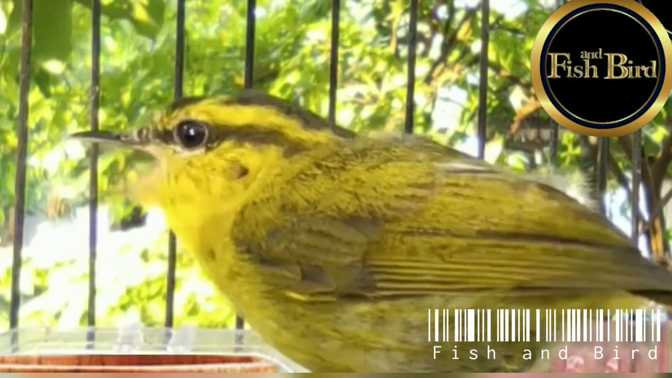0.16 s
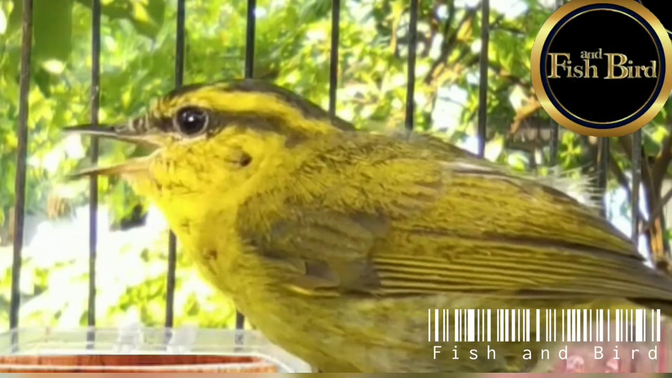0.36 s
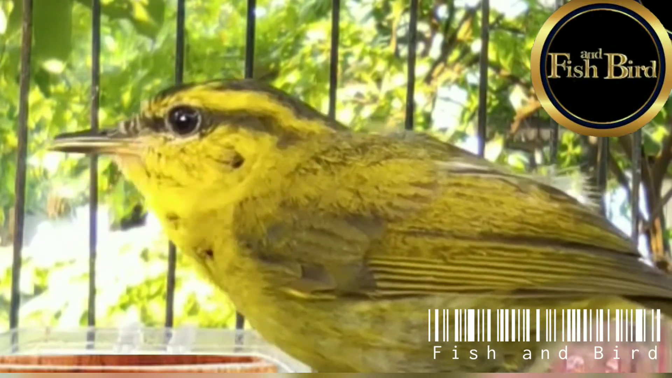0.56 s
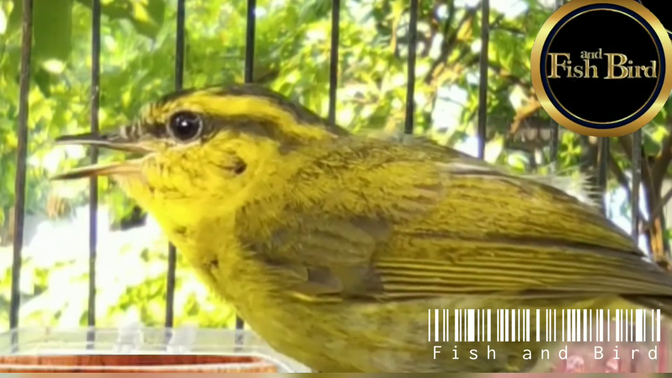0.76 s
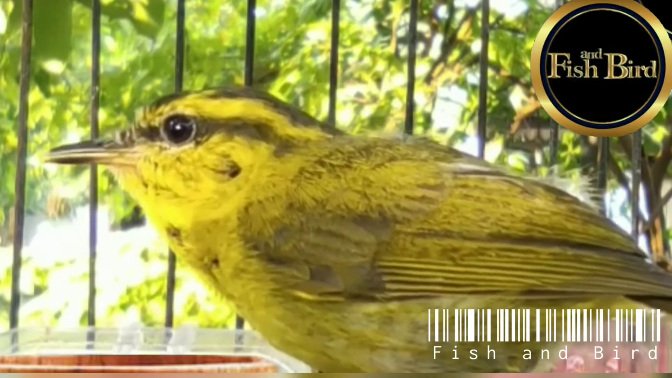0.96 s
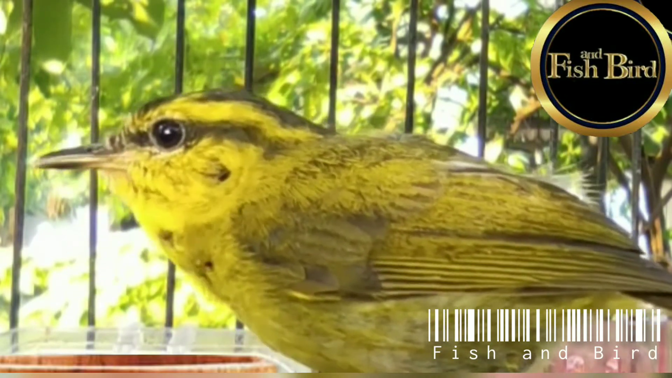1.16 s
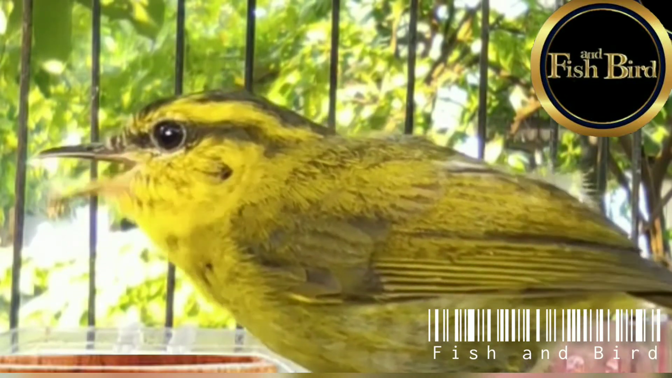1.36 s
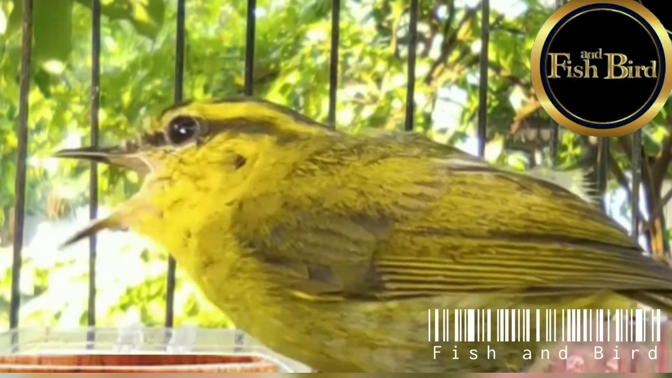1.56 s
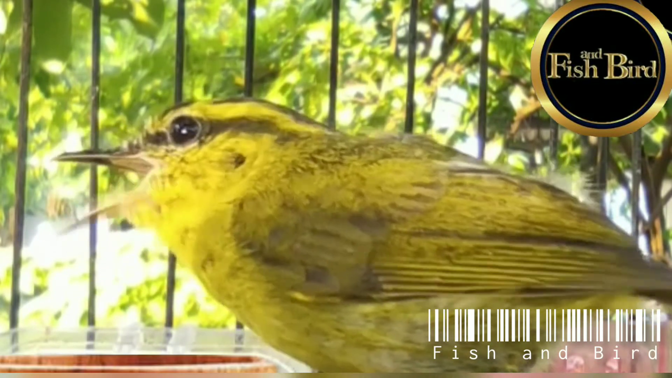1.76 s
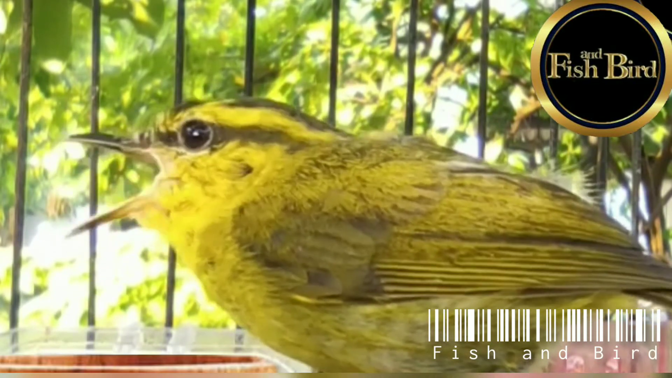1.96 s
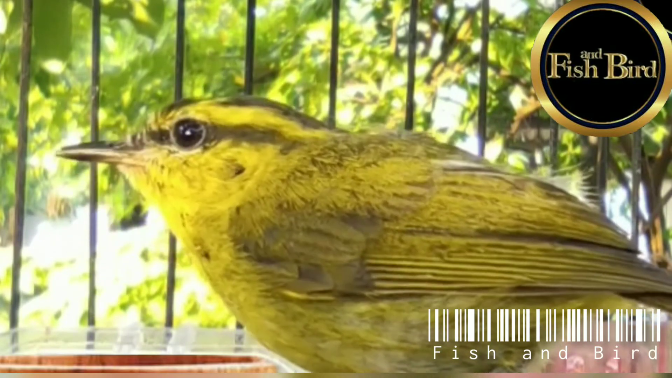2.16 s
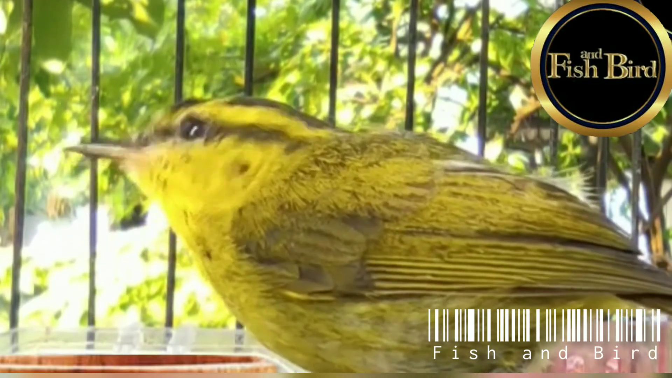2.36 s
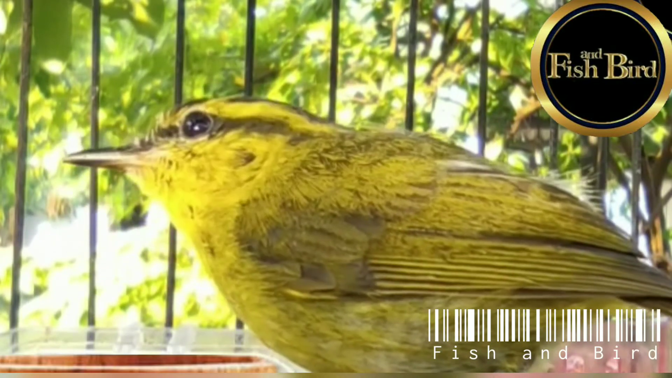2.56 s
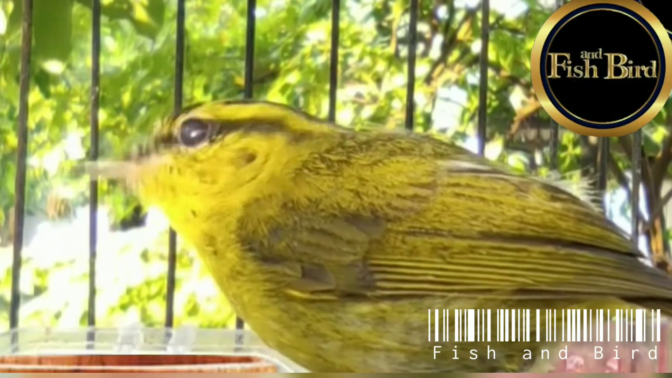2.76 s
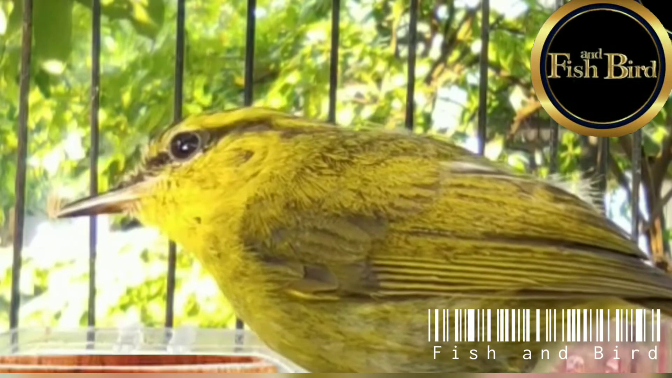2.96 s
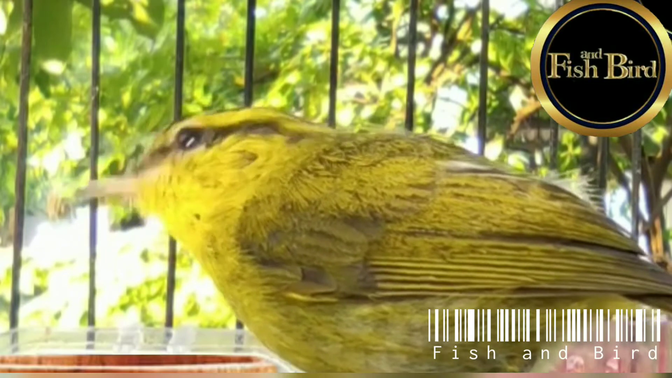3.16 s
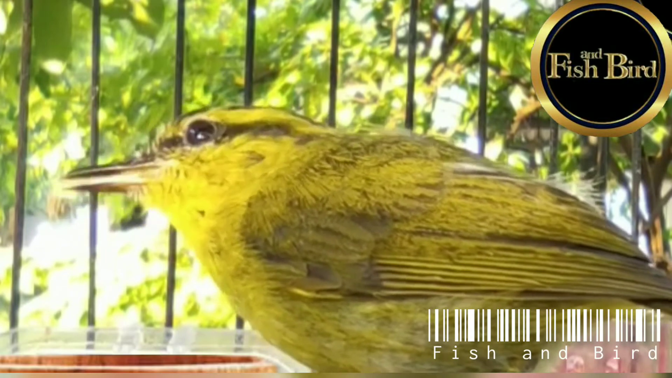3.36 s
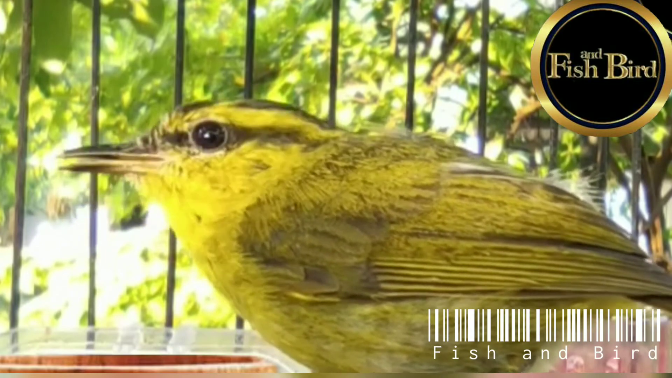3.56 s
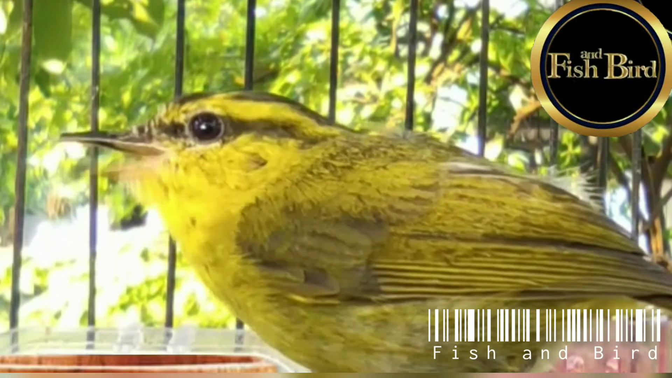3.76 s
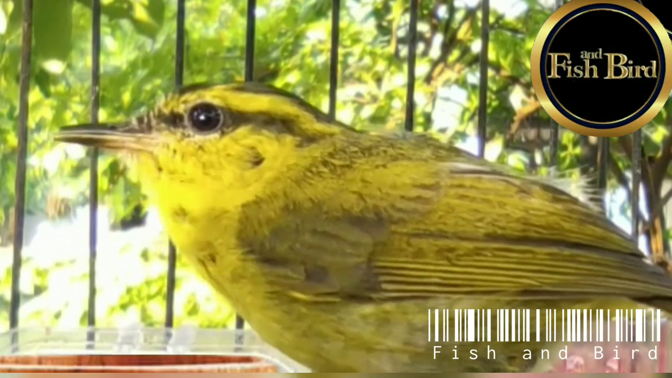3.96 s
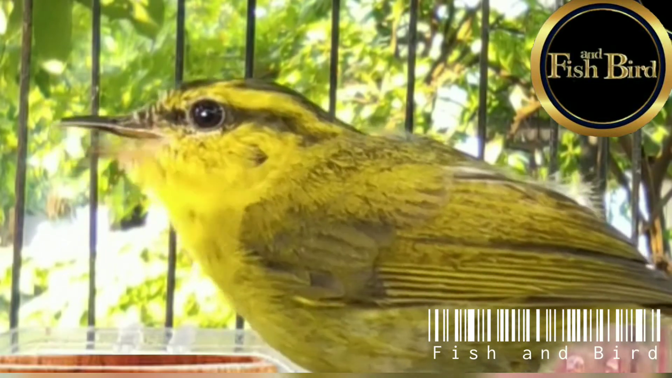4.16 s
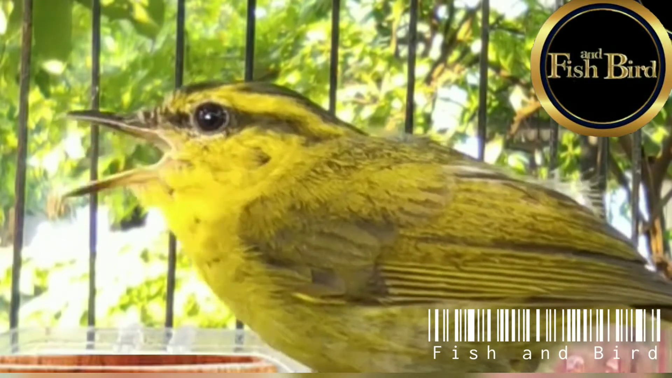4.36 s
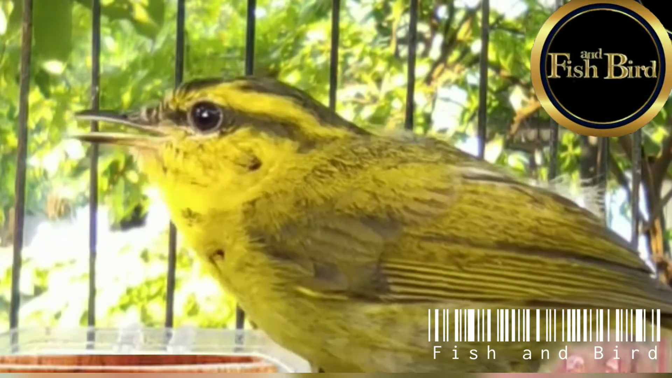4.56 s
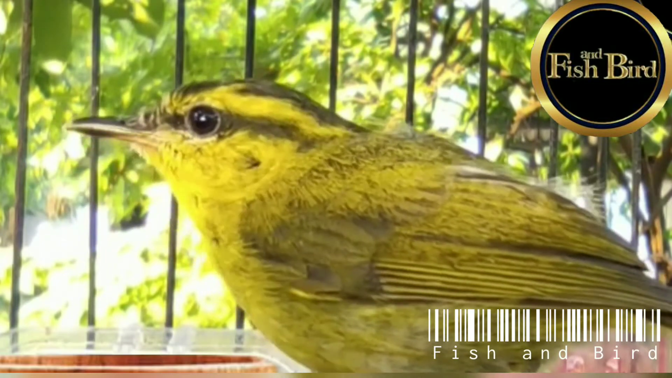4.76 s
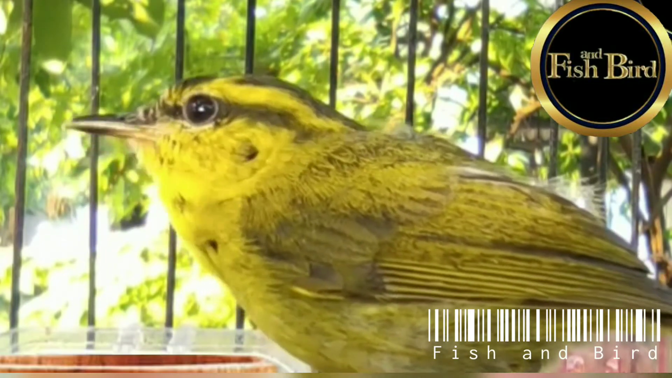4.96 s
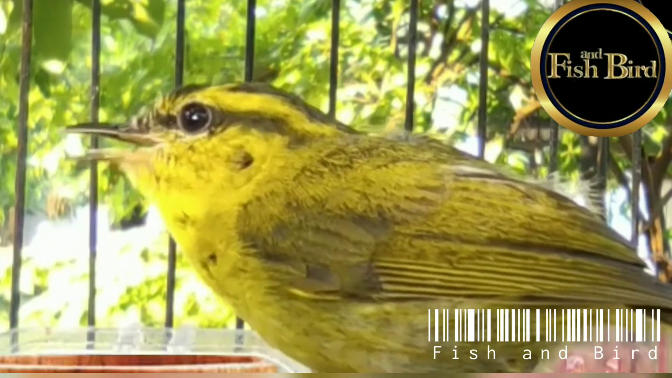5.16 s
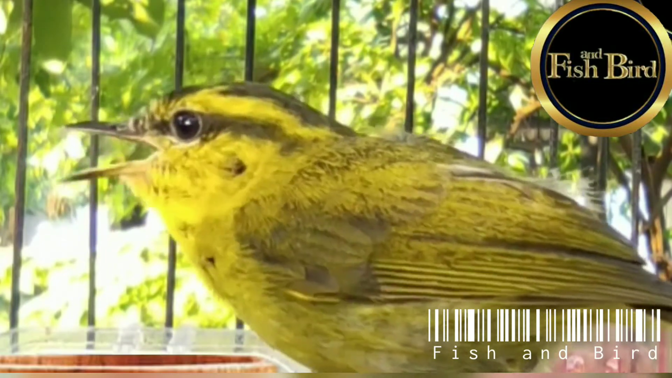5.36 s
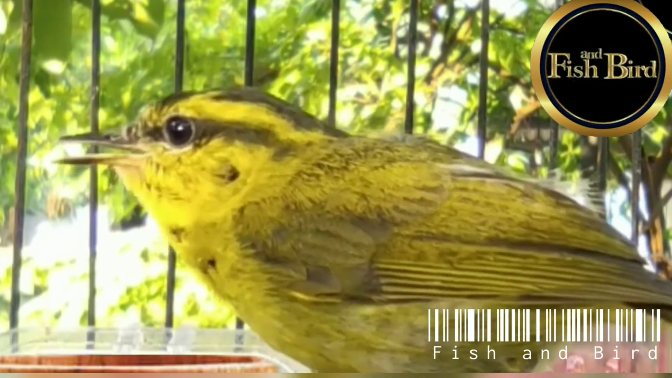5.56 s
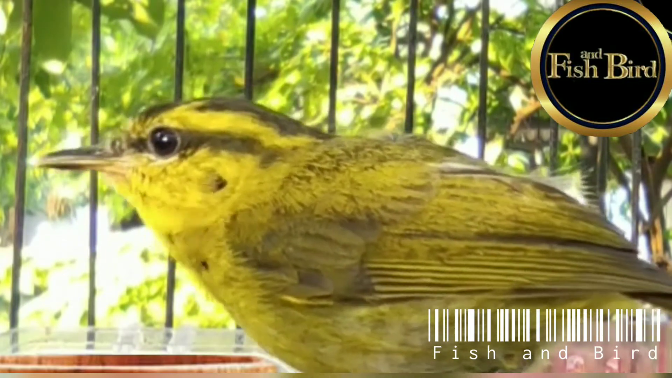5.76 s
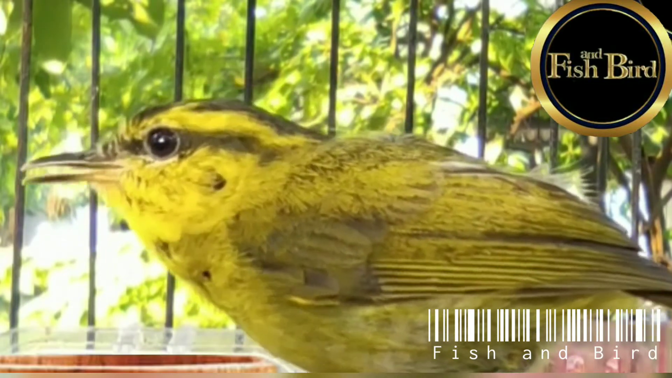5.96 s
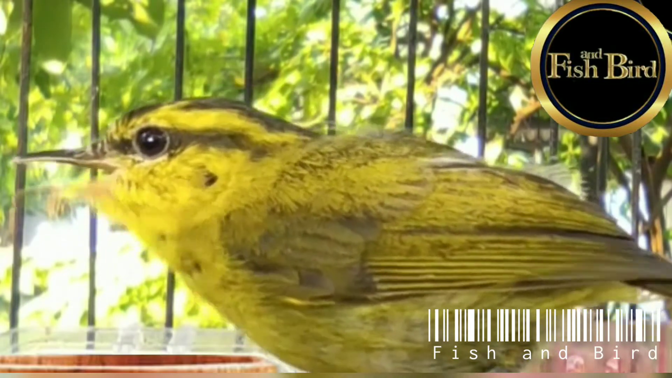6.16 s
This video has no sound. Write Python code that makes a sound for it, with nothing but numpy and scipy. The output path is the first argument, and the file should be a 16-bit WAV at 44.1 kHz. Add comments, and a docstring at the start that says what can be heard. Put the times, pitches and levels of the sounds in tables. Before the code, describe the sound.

A small caged warbler sings two fast, high twittering phrases up close, with other birds chirping farther off.

```python
"""In a room, a small caged warbler sings two fast twittering phrases right at a stereo microphone.
Each syllable is one sliding whistle with an overtone an octave up; high notes tend to be louder, and
some leap up from a low lead-in note. The loudest overload the recorder. Other birds chirp farther off,
over a low rumble, a machine hum, passing traffic and a few faint distant tones."""
import sys
import numpy as np
from scipy import signal
from scipy.fft import rfft, irfft, next_fast_len
from scipy.io import wavfile
from scipy.ndimage import uniform_filter1d, minimum_filter1d

SR = 44100
rng = np.random.default_rng(int(sys.argv[2]) if len(sys.argv) > 2 else 0)


def wrap_up_sound(samples):
    """Save the sound to the file named by the first command line argument, as 16-bit audio."""
    columns = np.atleast_2d(samples).T
    # keep every value between -1 and 1, then stretch to whole-number steps
    tamed = np.clip(columns, -1, 1)
    steps = np.round(tamed * 32767).astype(np.int16)
    wavfile.write(sys.argv[1], SR, steps)


N = 274302


def gain_of(db):
    """Turns decibels into a number to multiply by."""
    return 10 ** (np.asarray(db) / 20)


def evened(x):
    """Scales a sound so its average strength (rms) is 1."""
    return x / np.sqrt(np.mean(x ** 2) + 1e-20)


def look_up(table, hz, column=1):
    """Reads a table at any frequency, blending between its rows."""
    table = np.array(table, float)
    return np.interp(np.log(hz + 1), np.log(table[:, 0] + 1), table[:, column])


def add(mix, start_s, sound):
    """Mixes a sound in at its start time."""
    part = mix[..., max(round(start_s * SR), 0):][..., :sound.shape[-1]]
    part += sound[..., :part.shape[-1]]


def waver(count, hz):
    """A random wiggle of strength 1, mostly slower than hz."""
    size = next_fast_len(count + SR // 8)
    freqs = np.fft.rfftfreq(size, 1 / SR)
    spectrum = rfft(rng.standard_normal(size)) / (1 + (freqs / hz) ** 4)
    return evened(irfft(spectrum, size))[:count]


def phase_of(pitch):
    """How far a wave of changing pitch has turned, in radians."""
    return 2 * np.pi * np.cumsum(pitch) / SR


def glides(table, rasp, rasp_hz, swell_db, sweep_rasp=0):
    """Sliding tones that grow or fade. Rasp shakes the pitch; sweep_rasp adds more on wide slides."""
    out = np.zeros(N)
    for start, length, first_hz, last_hz, db in table:
        count = int(length * SR)
        shake = rasp + sweep_rasp * abs(np.log(last_hz / first_hz))
        pitch = np.linspace(first_hz, last_hz, count) * (1 + shake * waver(count, rasp_hz))
        shape = signal.windows.tukey(count, .5) * gain_of(np.linspace(0, swell_db, count))
        add(out, start, gain_of(db) * evened(np.sin(phase_of(pitch)) * shape))
    return out


# The background noise from bass to treble: (frequency [Hz], relative level [dB])
NOISE_COLOUR = [(25, -16), (50, -3), (85, -5), (115, -8), (160, -4), (250, -7), (700, -16), (950, -15),
                (1400, -19), (4500, -22.5), (8500, -20), (11000, -38.5), (14500, -39.5), (16000, -78.5)]
# How alike that noise is in the two microphones: (frequency [Hz], likeness [0-1])
NOISE_LIKENESS = [(150, 0.67), (400, 0.68), (1000, 0.072)]
# Its slow rise: (time [s], level change [dB])
NOISE_SWELL = [(1.8, -13), (3.599, -10.5), (5.201, -9), (6.199, -7)]


def rumble(left_db=-27, right_db=-29, patchy_db=2.06):
    """A low rumble, alike in both microphones, under a thin hiss from all around."""
    frames, hz = N // 512 + 5, np.fft.rfftfreq(2048, 1 / SR)
    a, b, c, d, patches = rng.standard_normal((frames, len(hz), 5)).T
    left, unrelated = a + 1j * b, c + 1j * d
    likeness = look_up(NOISE_LIKENESS, hz)[:, None]
    right = likeness * left + np.sqrt(1 - likeness ** 2) * unrelated
    patches = uniform_filter1d(patches, size=24, axis=0)  # blur across pitch...
    patches = evened(uniform_filter1d(patches, size=5, axis=1))  # ...and across time
    colour = gain_of(look_up(NOISE_COLOUR, hz)[:, None] + patchy_db * patches)
    noise = signal.istft(np.array([left, right]) * colour, nperseg=2048, noverlap=1536)[1][:, :N]
    swell_db = np.interp(np.arange(N) / SR, *np.transpose(NOISE_SWELL))
    return evened(noise) * gain_of(swell_db) * gain_of([[left_db], [right_db]])


# The tones of a humming machine: (pitch [Hz], level [dB])
HUM_TONES = [(135, -51), (150.5, -51.5), (177, -56)]


def machine_hum(drift=0.0122, drift_hz=3, sway_db=3.5, lean_left_db=3.5):
    """A machine hums a few low tones that drift a little in pitch and level."""
    out = np.zeros(N)
    for hz, db in HUM_TONES:
        level = np.sqrt(2) * gain_of(db + sway_db * waver(N, drift_hz))
        pitch = hz * (1 + drift * waver(N, drift_hz))
        out += level * np.sin(phase_of(pitch))
    return out * gain_of([[lean_left_db], [-lean_left_db]])


# Traffic going by: (time [s], length [s], first pitch [Hz], last pitch [Hz], level [dB])
TRAFFIC_DRONES = [(.1, 0.82, 86.6, 78.2, -46.5), (3.1, 1, 85.7, 93.3, -44.5),
                  (4.05, 0.51, 74.1, 68.8, -45.5), (4.62, 0.62, 76.1, 80, -43.5)]


def traffic():
    """Passing traffic makes low, unsteady drones that fade."""
    return glides(TRAFFIC_DRONES, rasp=0.087, rasp_hz=25, swell_db=-4)


# Far-off tones: (time [s], length [s], first pitch [Hz], last pitch [Hz], relative level [dB])
DISTANT_TONES = [(.6, 0.41, 670, 703.6, -50.5), (.62, 0.42, 1085, 1070, -51), (1.05, 0.47, 970, 1021, -45),
                 (1.9, 1.4, 964.5, 933, -56.5), (4.7, 0.29, 848, 1100, -53)]


def distant_tones():
    """Faint, wavering tones that each grow a little louder."""
    return glides(DISTANT_TONES, rasp=0.0275, rasp_hz=45.4, swell_db=2.5)


# How long the room rings: (frequency [Hz], time to fade by 60 dB [s])
ROOM_RING = [(3000, 0.4), (6000, 0.38), (14000, 0.35)]


def room(sound, first_echo_s=0.0095):
    """A wash of echoes, different in each microphone; the treble dies a little sooner."""
    echoes = rng.standard_normal((2, SR)) * (np.arange(SR) > first_echo_s * SR)
    hz, t, spectrum = signal.stft(echoes, SR, nperseg=256)
    fade = gain_of(-60 * t / look_up(ROOM_RING, hz)[:, None])
    tail = signal.istft(spectrum * fade, SR, nperseg=256)[1]
    return signal.fftconvolve(np.atleast_2d(sound), tail / np.linalg.norm(tail[0]), axes=1)[:, :N]


def chatter(count=50, length_s=.04, mean_db=-46):
    """The farthest birds give faint falling chips at random moments and pitches."""
    chips = []
    for when, height, loudness in rng.random((count, 3)):
        hz = 4500 + 3500 * height
        chips.append((when * N / SR, length_s, hz, .7 * hz, mean_db + 10 * (loudness - .5)))
    return glides(chips, rasp=0.015, rasp_hz=600, swell_db=-38, sweep_rasp=0.04)


# Other birds: (time [s], length [s], first pitch [Hz], last pitch [Hz], relative level [dB])
BIRD_CHIRPS = [ (.027, 0.02, 4150, 2050, -27.5), (0.28, 0.052, 4720, 4830, -30),
               (.395, 0.082, 6160, 4950, -29.5), (.32, 0.07, 6260, 6170, -27),
               (0.783, 0.087, 6180, 6330, -28.5), (.882, 0.029, 3690, 2290, -28),
               (0.93, 0.06, 6470, 4960, -27), (0.98, 0.083, 4960, 4800, -27),
               (1.14, 0.028, 6470, 4630, -25.5), (1.255, 0.025, 3540, 4870, -26.5),
               (1.36, 0.055, 6970, 7040, -34), (1.894, 0.19, 2170, 2850, -43),
               (2.345, 0.044, 4950, 4970, -41.5), (2.383, 0.024, 4700, 3710, -45.5),
               (2.655, 0.03, 6530, 4870, -46), (2.695, 0.046, 4910, 4850, -37.5),
               (2.728, 0.032, 4700, 3380, -44), (2.719, 0.052, 6910, 7370, -39.5),
               (2.895, 0.029, 6900, 4900, -44), (3.08, 0.1, 2950, 1926, -45.5),
               (3.228, 0.014, 2800, 2680, -33), (3.261, 0.029, 3370, 4420, -28),
               (3.447, 0.025, 4910, 4330, -30), (3.476, 0.017, 3675, 2420, -25.5),
               (3.857, 0.048, 6910, 7080, -27), (3.964, 0.1, 2360, 2692, -37.5),
               (4.095, 0.041, 3350, 4360, -26.5), (4.26, 0.084, 3430, 2290, -36.5),
               (4.366, 0.031, 3490, 2540, -32.5), (4.925, 0.1, 3850, 3630, -42),
               (5.17, 0.15, 3634, 3580, -35), (5.14, 0.041, 6970, 9300, -33),
               (5.21, 0.083, 6800, 7340, -34), (5.5, 0.022, 3750, 2196, -28),
               (5.976, 0.082, 2430, 2757, -35.5), (6.054, 0.03, 6730, 7040, -21.5)]


def chirps():
    """Birds across the room chirp; the wider a chirp slides, the hoarser it is."""
    return glides(BIRD_CHIRPS, rasp=0.012, rasp_hz=725, swell_db=-1.5, sweep_rasp=0.19)


# The four notes of a second bird's rising call: (pitch [Hz])
CALL_NOTES = [2108, 2715, 2998, 3585]
# Each time it calls: (time [s], length [s], relative level [dB])
CALLS = [(0.133, 0.11, -29), (0.986, 0.16, -29.5), (3.586, 0.1, -26), (4.476, 0.108, -29),
         (5.602, 0.11, -27)]


def rising_calls(rasp=0.036, rasp_hz=600, swell_db=22, slide_s=0.018, throb_hz=65, throb_db=3):
    """A bird climbs a stair of throbbing notes, hoarse at first, then clearer and louder."""
    out = np.zeros(N)
    for start, length, db in CALLS:
        progress = np.linspace(0, 1, int(length * SR), endpoint=False)
        stair = np.array(CALL_NOTES, float)[(progress * len(CALL_NOTES)).astype(int)]
        stair = uniform_filter1d(stair, int(slide_s * SR))
        pitch = stair * (1 + rasp * (1 - 0.56 * progress) * waver(len(stair), rasp_hz))
        throb = throb_db * np.sin(2 * np.pi * (throb_hz * length * progress + rng.random()))
        shape = signal.windows.tukey(len(stair), .25) * gain_of(swell_db * progress + throb)
        add(out, start, gain_of(db) * evened(np.sin(phase_of(pitch)) * shape))
    return out


def cage_echoes(song, echo_db=-24, first_s=0.003, last_s=.035, fall_db=-7, count=8):
    """Dish, bars and nearby walls send back echoes that clash with the song and make it flutter."""
    out = np.zeros((2, N))
    for side in (0, 1):
        lateness = (np.arange(count) + rng.random(count)) / count
        delays = first_s + (last_s - first_s) * lateness
        gains = gain_of(fall_db * lateness)
        for delay, gain in zip(delays, gains / np.linalg.norm(gains)):
            add(out[side], delay, gain * song[side])
    return gain_of(echo_db) * out


def recording_fizz(song, hiss_db=-44, fizz_db=-31, hiss_hz=(2000, 15000), fizz_hz=(12500, 16000)):
    loudness = np.sqrt(abs(uniform_filter1d(song ** 2, size=300, axis=1)))
    peaks = np.minimum(loudness / 0.89, 1) ** 4
    bands = (signal.butter(6, hz, "bandpass", fs=SR, output="sos") for hz in (hiss_hz, fizz_hz))
    hiss, fizz = (evened(signal.sosfilt(band, rng.standard_normal((2, N)))) for band in bands)
    return gain_of(hiss_db) * loudness * hiss + gain_of(fizz_db) * peaks * fizz


# How the song reaches the microphones: (frequency [Hz], left louder by [dB], left ahead by [radians])
MIC_PATHS = [(3100, -4.5, -1.2), (3100, -0.5, -1.46), (3660, 0.3, -0.6), (3640, 13, -0.5), (3836, 5.5, -3),
             (4120, -10, -1.64), (4150, -0.5, -1.18), (4560, 1, -1.96), (4600, -6, -1.46), (4710, 5, -1.52),
             (5047, -1.5, -2.5), (5520, -3.5, -1.5), (5530, 3, -1.5), (5860, -6.5, -2.5), (6540, -10, -1.5),
             (6420, -17, -0.5), (6800, -8, -1.6), (7420, -15.5, -1.4), (9100, 12, 2)]
# The bird turns its head, shifting high notes most: (time [s], extra left lead at 5500 Hz [radians])
HEAD_TURNS = [(2.1, -0.23), (3.6, -0.3), (4.55, -0.51), (4.9, 0.17)]


def at_microphones(start_s, pitch, levels):
    """Nearby reflections make each pitch louder and earlier in one microphone than in the other."""
    phase = phase_of(pitch)
    head_turn = np.interp(start_s, *np.transpose(HEAD_TURNS))
    out = np.zeros((2, len(pitch)))
    for harmonic, level in enumerate(levels, 1):
        hz = harmonic * pitch
        paths = [look_up(MIC_PATHS, hz), look_up(MIC_PATHS, hz, column=2)]
        # the reflections need a few milliseconds to follow a leap in pitch
        balance_db, lead = uniform_filter1d(paths, size=130, mode="nearest")
        balance = gain_of(balance_db)
        lead = lead + head_turn * (hz / 5500) ** 2
        left = balance * np.sin(harmonic * phase + lead / 2)
        right = np.sin(harmonic * phase - lead / 2)
        out += np.array([left, right]) * np.sqrt(2 / (1 + balance ** 2)) * level
    return out


# How loud the warbler is at equal effort: (pitch [Hz], relative level [dB])
VOICE_LEVELS = [(3100, -19), (3450, -7), (3850, -6.5), (4060, -3.5), (4380, -4.5), (4650, 0.5), (4860, -2),
                (5080, -1), (5800, .5), (6700, 3)]
# The octave as it leaves throat and beak: (its frequency [Hz], level against the main tone [dB])
OCTAVE_LEVELS = [(6200, -24), (7000, -24), (7500, -3.5), (8000, -16.5), (8500, -21), (9100, -20),
                 (10000, -34.5), (11000, -47), (13000, -52.5)]
# Low notes start flat and scoop up: (full scoop below [Hz], no scoop above [Hz])
SCOOP_RANGE = [3940, 4810]


def syllable(glide, effort_db, extra_octave_db, flutter_db=1.02, flutter_hz=90,
             scoop=.07, droop=0.017, hook_s=.006, attack_s=0.018, release_s=0.013, linger_s=0.0042):
    """The bird's voice box whistles one tone and a rougher octave. Gives the pitch and both levels."""
    effort_db = np.pad(effort_db, (0, int(linger_s * SR)), "edge")
    glide = np.pad(glide, (0, int(linger_s * SR)), "edge")
    count = len(glide)
    t = np.arange(count) / SR
    # the note is flat while the air pressure builds, and again as it fails
    flat = np.interp(glide[0], SCOOP_RANGE, [scoop, 0]) * np.exp(-t / hook_s)
    flat += droop * np.exp((t - t[-1]) / hook_s)
    tremble = 0.0038 * waver(count, 550) + 0.0031 * waver(count, flutter_hz)
    pitch = glide * (1 - flat + tremble)
    fade = np.sin(np.pi / 2 * np.clip(np.minimum(t / attack_s, (t[-1] - t) / release_s), 0, 1))
    level_db = effort_db + look_up(VOICE_LEVELS, glide) + flutter_db * waver(count, flutter_hz)
    level = np.sqrt(2) * fade * gain_of(level_db)
    roughness_db = 1.5 * waver(count, 410) + 3 * waver(count, flutter_hz)
    octave_db = look_up(OCTAVE_LEVELS, 2 * pitch) + extra_octave_db + roughness_db
    return pitch, [level, level * fade * gain_of(octave_db)]


def slur(progress, first_hz, turn_hz, last_hz, turn, ease_rad=1.4):
    """The pitch slides to a turning point, levels off, then slides on, as progress runs from 0 to 1."""
    turn = np.clip(turn, .05, .95)
    before = progress < turn
    away = np.where(before, (turn - progress) / turn, (progress - turn) / (1 - turn))
    bend = (np.sin(ease_rad * away) / np.sin(ease_rad)) ** 2
    return turn_hz + (np.where(before, first_hz, last_hz) - turn_hz) * bend


# The warbler's plain syllables: (time [s], length [s], first pitch [Hz], turning pitch [Hz],
# last pitch [Hz], place of the turn [0-1], effort [dB], growth [dB], mid-note swell [dB],
# extra octave level [dB])
SLURRED_NOTES = [ (0, 0.039, 6090, 6110, 6700, 0.21, 1, -8.5, -18, 17),
                 (0.3, 0.094, 3890, 3580, 4140, 0.22, -10.5, 3.5, -0.5, 1.5),
                 (0.433, 0.14, 5080, 4184, 5247, 0.63, -5, 2, -8.5, -7.5),
                 (0.623, 0.055, 3190, 3425, 3010, 0.25, -4.5, 3, -2, 8.5),
                 (0.793, 0.034, 4220, 4380, 4420, 0.35, -5.5, 3, 9, -15),
                 (0.839, 0.088, 4440, 3847, 3690, 0.42, -3.5, -5.5, 3, -6.5),
                 (0.962, 0.13, 3336, 3423, 3130, 0.5, -4, 1.5, -6, 2.5),
                 (1.336, 0.11, 4100, 3805, 4426, 0.3, -5, 5.5, 0, -4.5),
                 (1.613, 0.082, 4785, 5785, 6266, 0.38, -2, 2, -4.5, 4),
                 (1.746, 0.064, 5245, 4954, 5147, 0.6, -1, -2.5, -5, 5),
                 (1.842, 0.032, 5320, 5315, 5310, 0.34, -2.5, -8, 7, 3),
                 (3.384, 0.069, 4980, 5070, 5660, 0.46, -26, 7.5, -2, -8),
                 (3.538, 0.15, 6800, 5390, 5790, 0.59, -21, 4.5, -10, 2),
                 (3.728, 0.041, 4900, 4730, 4780, 0.87, -16.5, 11, 0, -13),
                 (3.817, 0.022, 4920, 5010, 5030, 0.1, -13, 4, 4, -2),
                 (3.845, 0.13, 5270, 4430, 4670, 0.75, -10, 2, 1, 7.5),
                 (4.021, 0.054, 3896, 3210, 3390, 0.62, -8.5, 5.5, 0.5, 5.5),
                 (4.112, .12, 4310, 3740, 4370, 0.52, -7, 0.5, -5.5, -2),
                 (4.431, 0.03, 5870, 5765, 5630, 0.2, -4, 4, -2, 5),
                 (4.481, 0.03, 5220, 5120, 5190, 0.34, -2.5, -8, 4, 11.5),
                 (5.051, 0.091, 3790, 3504, 4005, 0.3, -15.5, 12, -2.5, 7),
                 (5.195, 0.14, 5040, 4224, 5160, 0.54, -7.5, 5.5, -9.5, -5),
                 (5.388, 0.053, 3437, 3090, 3200, 0.9, -4.5, -0.5, 4, 6),
                 (5.556, 0.043, 4320, 4370, 4340, 0.4, -10, -7, 14, -6.5),
                 (5.606, 0.076, 4340, 3788, 3790, 0.57, -4, -0.5, -3.5, -10),
                 (5.731, 0.12, 3270, 3394, 3140, 0.6, -5, -4.5, -5, 1),
                 (6.117, 0.022, 3650, 4000, 3930, 0.4, -8.5, -9, 4, -2),
                 (6.151, 0.07, 3950, 3900, 4360, 0, -5, 3, -1.5, -5)]


def slurred_notes():
    """The warbler sings one bend in pitch under one smooth change of effort."""
    out = np.zeros((2, N))
    for start, length, *bend, db, growth_db, swell_db, octave_db in SLURRED_NOTES:
        progress = np.linspace(0, 1, int(length * SR))
        arch = 4 * progress * (1 - progress) - 2 / 3  # highest mid-note, zero on average
        effort_db = db + growth_db * (progress - .5) + swell_db * arch
        pitch, levels = syllable(slur(progress, *bend), effort_db, octave_db)
        add(out, start, at_microphones(start, pitch, levels))
    return out


# Its leaping syllables: (time [s], lead-in length [s], slur length [s], lead-in pitch [Hz],
# overshoot [Hz], first pitch [Hz], turning pitch [Hz], last pitch [Hz], place of the turn [0-1],
# effort [dB], growth [dB], extra lead-in effort [dB], extra octave level [dB])
LEAPING_NOTES = [ (0.152, 0.028, 0.061, 4310, 780, 6820, 5196, 5760, 0.29, -4, 4, -11, -3),
                 (0.678, 0.007, 0.081, 3160, 460, 5555, 4615, 4120, 0.4, -3, -3.5, -8, -3.5),
                 (1.139, 0.036, 0.13, 3850, 2650, 4350, 3210, 3615, 0.42, -7.5, 1.5, -1.5, -4),
                 (1.499, 0.055, 0.071, 5520, 1950, 5410, 4470, 4580, 0.86, -7, -4, 2, 9.5),
                 (1.905, 0.039, 0.19, 4450, 65, 5470, 5710, 4110, 0.33, -5.5, -3, -1, 4.5),
                 (4.268, 0.03, 0.091, 4647, 4, 5450, 5790, 6120, 0.26, -6, 1, 2.5, -7),
                 (4.544, 0.018, 0.16, 4805, 20, 5510, 3774, 3570, 0.68, -7, -4.5, 6, 2.5),
                 (4.901, 0.035, 0.058, 4190, 1040, 6040, 5125, 5630, 0.45, -11, 3, -7, -22),
                 (5.441, 0.0067, 0.089, 3200, 120, 5550, 4695, 3905, 0.3, -5, -1.5, -25, -5),
                 (5.908, 0.044, 0.12, 3830, 3020, 3680, 3260, 3550, 0.59, -8, 1.5, -0.5, -3)]


def leaping_notes(leap_s=0.0032, flick_s_per_hz=4.2e-6, flick_steepness=2.7):
    """The warbler holds a lead-in note, jumps, overshoots in a quick flick and settles into a slur."""
    out = np.zeros((2, N))
    for row in LEAPING_NOTES:
        start, lead_s, slur_s, lead_hz, over_hz, *bend, db, growth_db, lead_db, octave_db = row
        t = np.arange(-lead_s, slur_s, 1 / SR)
        progress = np.clip(t / slur_s, 0, 1)
        jumped = 1 / (1 + np.exp(-t / leap_s))  # 0 before the leap, 1 after
        flick_s = flick_s_per_hz * max(over_hz, 1)  # a higher overshoot takes longer to come back
        flick = over_hz * np.exp(-.5 * abs(t / flick_s) ** flick_steepness)
        glide = lead_hz + (slur(progress, *bend) - lead_hz) * jumped + flick
        effort_db = db + growth_db * (progress - .5) + lead_db * (1 - jumped)
        pitch, levels = syllable(glide, effort_db, octave_db)
        add(out, start, at_microphones(start, pitch, levels))
    return out


def scene():
    """The near warbler has little room echo; birds farther off have more, the farthest only echo."""
    warbler = slurred_notes() + leaping_notes()
    near = warbler + cage_echoes(warbler) + recording_fizz(warbler)
    far = chirps() + distant_tones()
    rising = rising_calls()
    direct = gain_of(-4) * far + gain_of(0.5) * rising
    echoes = room(gain_of(0.5) * far + gain_of(1) * rising + chatter())
    return traffic() + near + gain_of(-21.5) * room(near) + direct + echoes + rumble() + machine_hum()


def record(dry, ceiling=1.13, knee=.8, treble_hz=16000, treble_db=-12, cutoff_hz=17500):
    """A fast limiter turns the loudest notes down; their peaks round off and add overtones."""
    allowed = 1 / np.maximum(abs(dry) / ceiling, 1)
    held = dry * uniform_filter1d(minimum_filter1d(allowed, size=60), size=60)
    clean = np.clip(held, -knee, knee)
    rounded = clean + (1 - knee) * np.tanh((held - clean) / (1 - knee))
    # the highest treble is dulled, and nothing passes above the cutoff
    below_treble = signal.firwin(255, treble_hz, window=("kaiser", 8), fs=SR)
    below_cutoff = signal.firwin(255, cutoff_hz, window=("kaiser", 8), fs=SR)
    dulling = below_treble + gain_of(treble_db) * (below_cutoff - below_treble)
    return signal.oaconvolve(rounded, dulling[None], "same")


dry = scene()
out = record(dry)
wrap_up_sound(out)
```